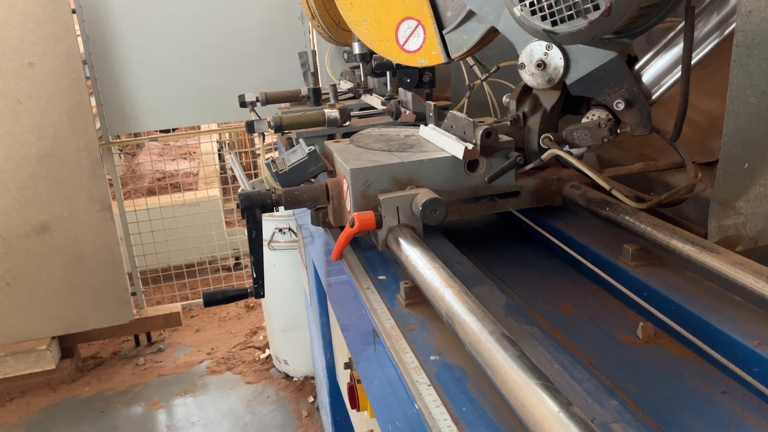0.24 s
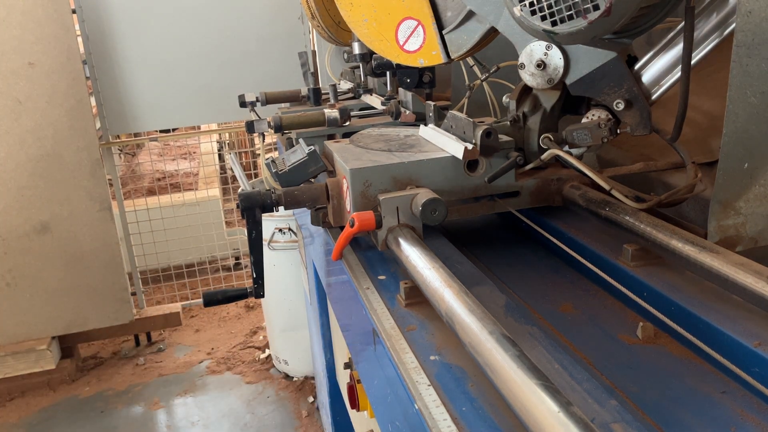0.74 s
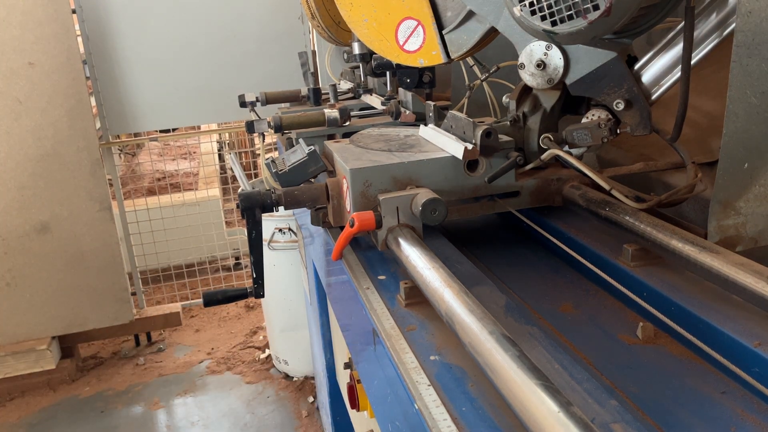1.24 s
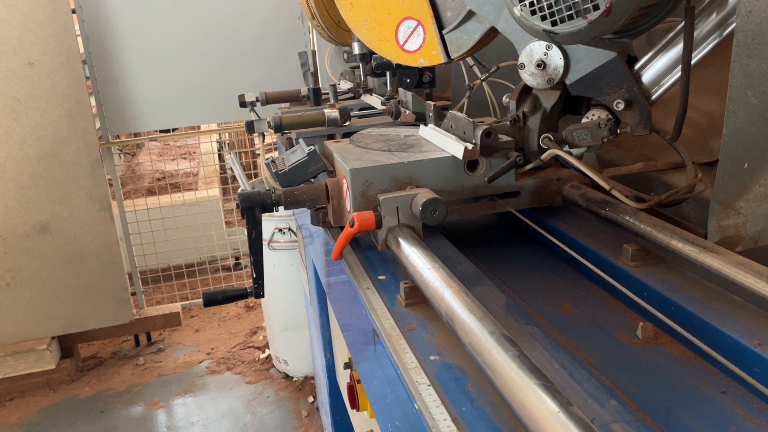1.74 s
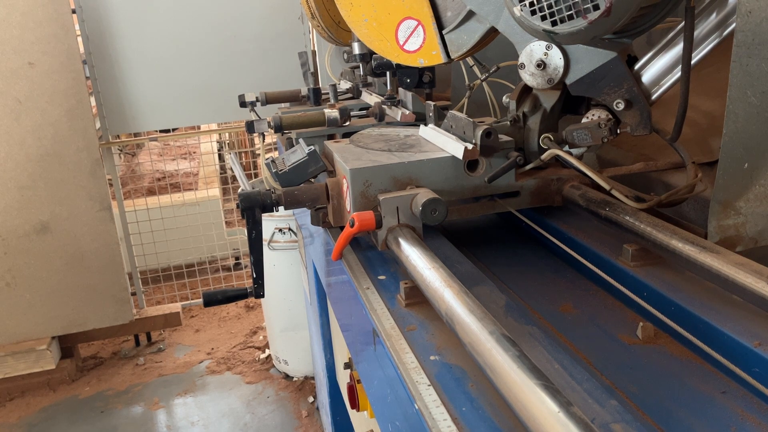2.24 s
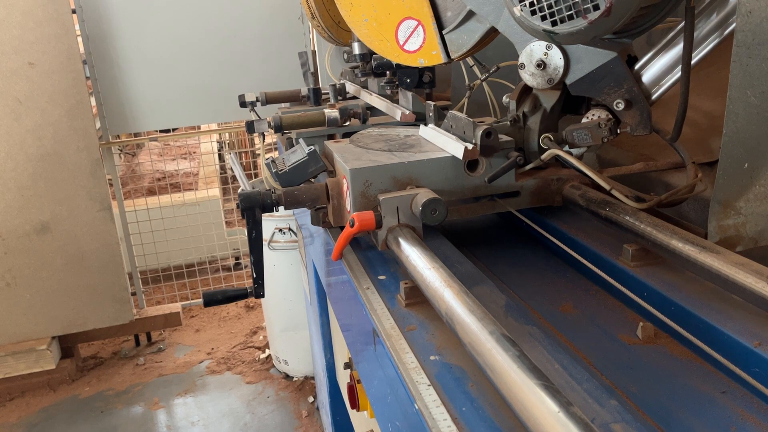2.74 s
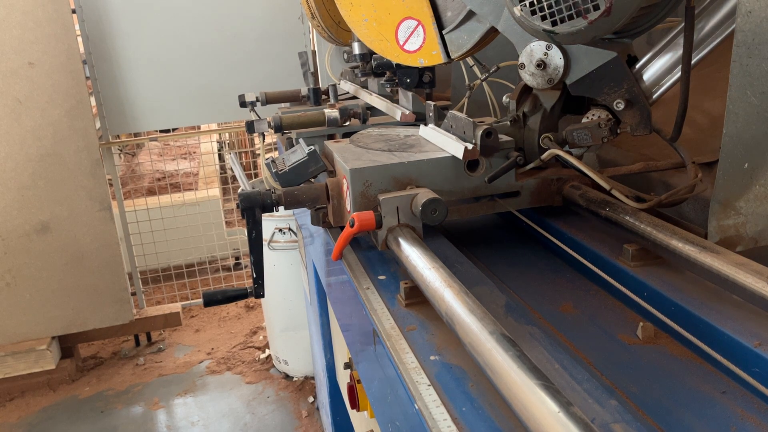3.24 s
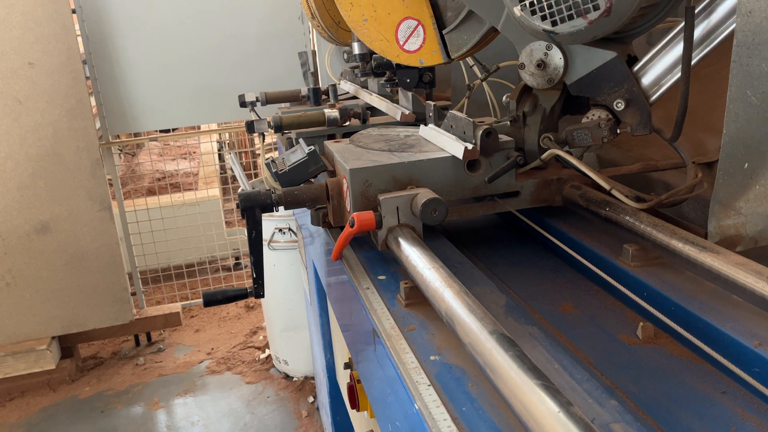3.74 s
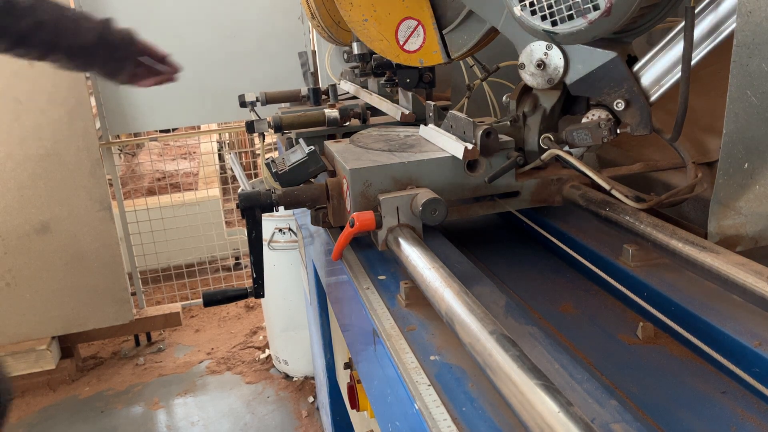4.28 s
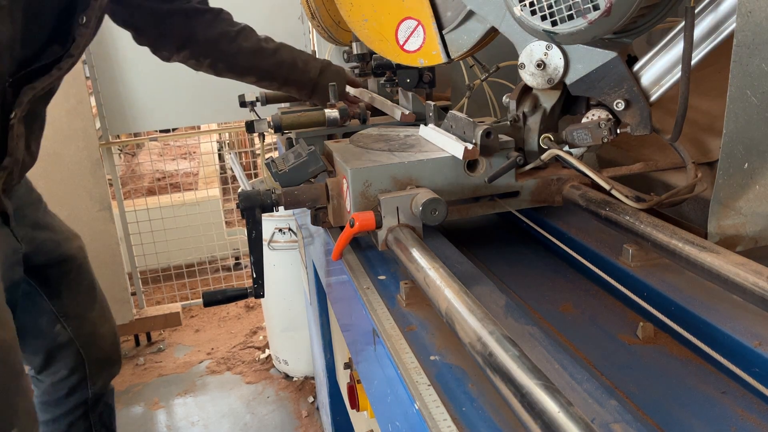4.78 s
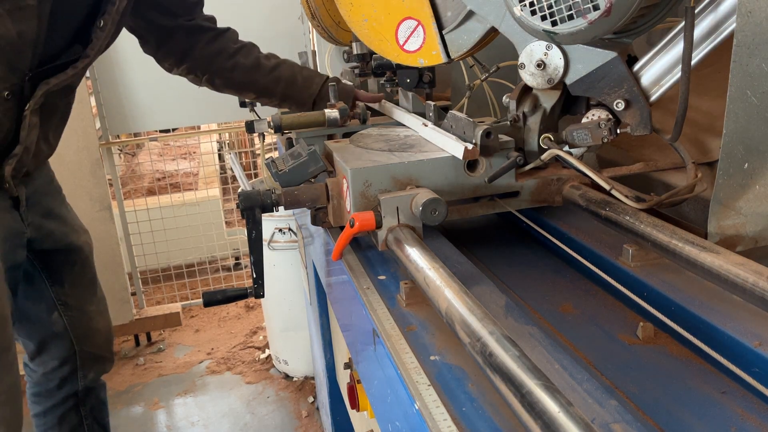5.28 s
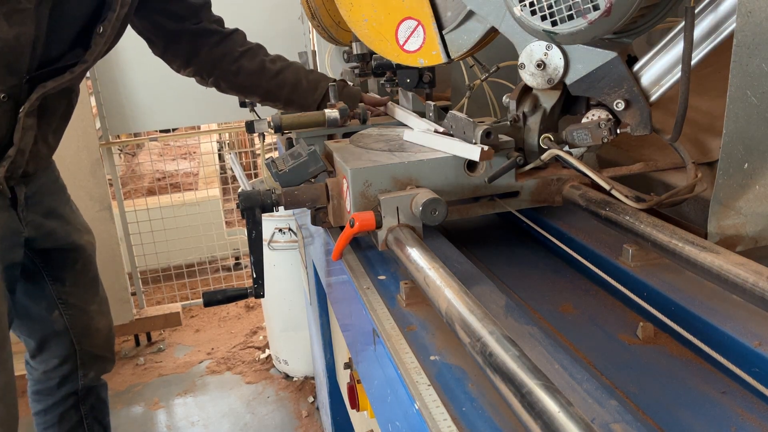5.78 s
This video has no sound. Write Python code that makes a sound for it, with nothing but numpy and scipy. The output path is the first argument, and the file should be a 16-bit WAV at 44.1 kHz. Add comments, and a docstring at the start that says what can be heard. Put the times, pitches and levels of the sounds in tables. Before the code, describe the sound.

A big mitre saw coasts down, its airy whir and whine steadily sinking while a rumbling head slides to its stop. A heavy clunk comes with a sharp burst of compressed air and a sputtering hiss. Small metallic knocks and clicks follow as the hum fades. Near the end a sleeve rustles and an aluminium bar is scraped, tapped and left ringing. Close stereo pickup in a dull, short-echo workshop.

```python
"""A mitre saw coasts down: blade wind and whine follow the falling shaft rate through fixed guard resonances.
Frame hum and guard drone swell at their critical speeds; the sliding head adds rumble until it eases off.
A valve spits and hisses (shaped noise), the head clunks on its stop (short low swings), fittings knock (modes).
Later a sleeve rustles and an aluminium profile is dragged, tapped and left ringing on the table.
A workshop murmur lies underneath; two microphones differ in phase and level over frequency."""
import sys
import numpy as np
from scipy import signal
from scipy.fft import rfft, irfft, next_fast_len
from scipy.io import wavfile
from scipy.ndimage import uniform_filter1d

SR = 44100
rng = np.random.default_rng(int(sys.argv[2]) if len(sys.argv) > 2 else 0)


def inscribe(sig):
    """Save sig as 16-bit PCM at rate SR to the path in sys.argv[1].

    A 1-D sig is mono; a 2-D sig holds one channel per row.
    Samples are clipped to [-1, 1] before scaling.
    """
    pcm = np.round(np.clip(np.atleast_2d(sig).T, -1, 1) * 32767)
    wavfile.write(sys.argv[1], SR, pcm.astype(np.int16))


N = 265393
T = np.arange(N) / SR

START_TURNS_PER_S, BRAKING_TURNS_PER_S2 = 42.75, 5.95


def shaft_rate():
    """Blade turns/s: bearing friction takes away the same speed every second."""
    return np.maximum(START_TURNS_PER_S - BRAKING_TURNS_PER_S2 * T, 1)


# blade guard resonances: f/Hz, width/Hz, level/dB re direct sound
GUARD = [(362, 44, 16), (418, 56, 15.5), (505, 56, 13), (600, 37, 6.5), (703, 65, 10.5), (867.6, 12, 11),
         (1010, 66, 7), (1243, 77, 2.5), (1659, 19, 10.5), (1970, 47, 3.5), (2540, 1100, 0),
         (10600, 4200, 6)]
HOLLOW_HZ, HOLLOW_WIDTH_HZ, HOLLOW_DB = 1375, 190, -5.5


def guard(hz):
    """Gain of the guard: resonances added in power to the direct sound, with one hollow between them."""
    power = 1
    for f, width, db in GUARD:
        power = power + undb(db) ** 2 / (1 + (2 * (hz - f) / width) ** 2) ** 2
    hollow = undb(HOLLOW_DB * np.exp(-(2 * (hz - HOLLOW_HZ) / HOLLOW_WIDTH_HZ) ** 2))
    return np.sqrt(power) * hollow


# wind round the blade: f/shaft rate, relative density/dB
WIND = [(3.4, -97), (8, -100.5), (14.5, -86), (22.5, -78), (34, -79.5), (52, -81.5), (73, -87), (112, -93),
        (190, -102), (335, -109), (780, -122)]
# blade whine: f/shaft rate, relative level/dB
WHINE = [(10.3, -66), (12, -66), (14, -65), (16, -62), (16.7, -62), (18, -54.5), (19.8, -62), (21.8, -62),
         (26, -66), (30.5, -64), (33, -66), (35.8, -66), (39.5, -66), (48, -66), (56, -69)]
# gain at the start speed, loss per halving of speed
WIND_DB, WIND_DB_PER_HALVING = 1.5, 6.5
WHINE_DB, WHINE_DB_PER_HALVING = -4.5, 7.5


def blade(flutter_db=1, waver_db=3.0, phase_waver_rad=0.59, side_spread_rad=0.26):
    """Wind and whine scale with shaft rate, so both sink through the fixed guard resonances."""
    shaft = shaft_rate()
    halvings = np.log2(START_TURNS_PER_S / shaft)
    hz, times, bins = signal.stft(field(), SR, nperseg=1024)
    bins = bins * undb(spectrum(WIND, hz[:, None] / np.interp(times, T, shaft)))
    wind = signal.istft(bins, SR)[1][:, :N]
    wind = wind * undb(WIND_DB - WIND_DB_PER_HALVING * halvings + flutter_db * walk(18))
    turn_rad = 2 * np.pi * np.cumsum(shaft) / SR
    whine = 0
    for multiple, db in WHINE:
        # a gliding tone crosses the room's standing waves: level and phase waver
        side_phase = side_spread_rad * np.array([walk(4.94), walk(4.64)])
        phase = multiple * turn_rad + phase_waver_rad * walk(19) + side_phase
        whine = whine + np.sqrt(2) * undb(db + waver_db * walk(9)) * np.sin(phase)
    whine = whine * undb(WHINE_DB - WHINE_DB_PER_HALVING * halvings)
    return colour(wind + whine, guard)


def critical(turns_per_s, half_width, db):
    """Gain of a part that shakes most at one shaft speed."""
    return undb(db) / (1 + ((shaft_rate() - turns_per_s) / half_width) ** 2)


# frame hum, guard drone, slide rumble: f/Hz, relative density/dB
HUM = [(25, -107), (45, -74), (66, -56), (88, -66), (122, -54.5), (150, -60), (175, -71), (205, -64),
       (270, -73.5), (600, -110)]
DRONE = [(250, -100), (320, -64.5), (360, -69), (425, -54), (470, -69), (515, -63), (570, -101),
         (800, -105)]
SLIDE = [(25, -89), (62, -65), (95, -61), (200, -66.5), (275, -81), (370, -71), (550, -79), (1050, -77),
         (1500, -83.5), (2500, -109), (6000, -105)]
SLIDE_END_S, SLIDE_RELEASE_T60_S, SLIDE_LEVEL_DB = 0.498, 0.085, 1


def frame(throb_db=1.5):
    """Frame and guard shake most at their critical speeds; the head's slide adds a rumble that then dies."""
    hum = noise(HUM) * critical(turns_per_s=28.4, half_width=6.4, db=-5) * undb(throb_db * walk(15))
    drone = noise(DRONE) * critical(turns_per_s=23.2, half_width=10.8, db=-13.5) * undb(2.6 * walk(12))
    sliding = fade(np.maximum(T - SLIDE_END_S, 0), SLIDE_RELEASE_T60_S)
    return hum + drone + noise(SLIDE) * sliding * undb(SLIDE_LEVEL_DB + 3.0 * walk(40.1))


def swing(db, hz, swell_s):
    """A heavy blow that swells and dies within a few swings."""
    t = T[:SR // 2]
    return -undb(db) * t / swell_s * np.exp(1 - t / swell_s) * np.sin(2 * np.pi * hz * t)


# head strikes its stop: t/s, level/dB
STOPS = [(0.836, -19), (0.89, -11.5)]
STOP_HZ, STOP_SWELL_S = 87, 0.0065
ROCK_S, ROCK_GAP_S, ROCK_HZ, ROCK_SWELL_S = .924, .072, 96, 0.017
ROCK_DB, ROCK_LOSS_DB = -24.5, 7


def clunk(count=3):
    """The head strikes its stop, then rocks on it evenly and ever more weakly."""
    out = np.zeros(N)
    for start, db in STOPS:
        add(out, start, swing(db, STOP_HZ, STOP_SWELL_S))
    for k in range(count):
        rock = swing(ROCK_DB - k * ROCK_LOSS_DB, ROCK_HZ, ROCK_SWELL_S)
        add(out, ROCK_S + k * ROCK_GAP_S, rock)
    return out


# steel blade modes: f/Hz, level/dB, t60/s
BLADE_RING = [(1710, -50, 0.77), (2230, -49, 0.38), (3160, -54, 0.48), (3300, -37, 0.47), (3640, -57, 0.44),
              (4260, -45, 1), (4150, -50, 0.8), (5270, -46.5, 0.53), (5300, -61, 0.72), (9883, -56, 0.79)]
CLUNK_S = .885


def blade_ring():
    """The jolt of the stop sets the blade's modes ringing."""
    out, t = np.zeros(N), T[:2 * SR]
    ring = sum(undb(db) * fade(t, t60) * np.sin(2 * np.pi * hz * t) for hz, db, t60 in BLADE_RING)
    add(out, CLUNK_S, ring * (1 - np.exp(-t / 0.0024)))
    return out


# light frame thumps: t/s, level/dB
THUMPS = [(.125, -35), (0.376, -27), (0.484, -41), (1.094, -33.5), (2.681, -31), (2.719, -30.5),
          (2.737, -34), (2.937, -35), (3.13, -31.5), (5.094, -34.5)]
# frame modes: f/Hz, relative level/dB, swell/s
FRAME_MODES = [(114.7, -2.5, 0.0085), (202.7, -5, 0.0062), (340, -5, 0.0037)]


def thumps():
    """Light blows swing the frame in its low modes."""
    out = np.zeros(N)
    for start, db in THUMPS:
        add(out, start, sum(swing(db + mode_db, hz, swell_s) for hz, mode_db, swell_s in FRAME_MODES))
    return out


def burst(start, db, rise_s, t60):
    """An envelope that opens quickly and dies away."""
    t = np.maximum(T - start, 0)
    return undb(db) * (1 - np.exp(-t / rise_s)) * fade(t, t60)


# spitting and exhausting air: f/Hz, relative density/dB
SPIT = [(300, -99), (1500, -81), (3000, -68.5), (5000, -73), (7500, -71), (10500, -71.5), (14500, -81)]
EXHAUST = [(100, -62), (400, -84), (900, -83), (2200, -78), (3300, -74.5), (4500, -79.5), (5600, -81.5),
           (7500, -85), (10500, -86), (14500, -102)]
# spits: t/s, level/dB, t60/s, gain below the treble/dB
SPITS = [(0.828, 7, 0.085, 1), (0.884, 8, 0.06, 2), (.938, -5, .04, 0), (1.021, 2, 0.055, -1),
         (1.076, 1, 0.09, -1), (2.105, -22, 0.3, -1), (3.834, -12, 0.38, 0), (4.382, -14.5, 0.25, -8),
         (4.418, -12.5, 0.36, -5)]
SPIT_RISE_PER_T60, SPIT_TREBLE_HZ = 0.029, 9300
EXHAUST_S, EXHAUST_RISE_S = .873, 0.0056


def air(flutter_db=0.2, sputter_db=1.5):
    """The valve spits noise and the cylinder empties: a first burst, then a long sputtering hiss."""
    jet = noise(SPIT)
    body = colour(jet, lambda hz: 1 / (1 + (hz / SPIT_TREBLE_HZ) ** 10))
    spits = 0
    for start, db, t60, body_db in SPITS:
        tinted = jet + (undb(body_db) - 1) * body
        spits = spits + tinted * burst(start, db, SPIT_RISE_PER_T60 * t60, t60)
    pressure = burst(EXHAUST_S, db=13, rise_s=EXHAUST_RISE_S, t60=0.083)
    pressure = pressure + burst(EXHAUST_S, db=5.3, rise_s=EXHAUST_RISE_S, t60=1.62)
    return spits + noise(EXHAUST) * pressure * undb(flutter_db * walk(69.7) + sputter_db * walk(500))


CONTACT_S = 0.0013
EDGE_T60_S, EDGE_CORNER_HZ = .06, 5000  # tick gain is proportional to corner / EDGE_CORNER_HZ


def strike(modes, db, corner_hz, favoured_hz, other_favoured_hz, held_t60, free_db, crack_db, tick_db,
           scatter_db=2.0, favour_db=9, favour_width=0.057, favour_sustain=0.41, split=0.0038,
           crack_t60=0.14, beat_hz=4, rebound_db=-7):
    """Metal rings briefly in contact, then faintly on; the struck spot favours modes near two pitches."""
    t = T[:int(.7 * SR)]
    attack = slice(0, int(.03 * SR))
    hz, held_db, ring_db, free_t60 = np.transpose(modes)[:, :, None]
    size, detune, beat, phase = rng.standard_normal((4, len(hz), 1))
    near = [np.exp(-(np.log(hz / f) / favour_width) ** 2) for f in (favoured_hz, other_favoured_hz)]
    favour = np.maximum(*near)
    # contact pressure pulls each mode slightly off its free pitch
    held = np.sin(2 * np.pi * (hz * (1 + split * detune) * t + phase))
    held = held * fade(t, held_t60 * (1 + favour_sustain * favour))
    held = held * undb(held_db + scatter_db * size + favour_db * favour)
    # each free mode is a close pair that beats slowly
    pair = np.sin(2 * np.pi * (hz * t + phase))
    pair = pair + np.sin(2 * np.pi * ((hz + beat_hz * beat) * t + size)) / 2
    free = undb(ring_db + free_db) * fade(t, free_t60) * pair
    ring = np.sum(held + free, axis=0)
    crack = lowpass(rng.standard_normal(len(t)), 2000, order=1) * fade(t, crack_t60)
    hit = ring / ring[attack].std() + undb(crack_db) * crack / crack[attack].std()
    hit = lowpass(hit * (1 - np.exp(-t / CONTACT_S)), corner_hz, order=3)
    # the part chatters once more within milliseconds
    add(hit, rng.uniform(.003, .007), undb(rebound_db) * hit[:len(t) // 2])
    # hard edges touch: faint bright tick
    tick = rng.standard_normal(len(t)) * fade(t, EDGE_T60_S)
    tick = undb(tick_db) * corner_hz / EDGE_CORNER_HZ * tick
    return undb(db) * (hit / hit[attack].std() + tick)


# slide and clamp modes: f/Hz, held level/dB, free level/dB, free t60/s
FITTINGS = [(671, 7.5, -5, 0.22), (760, 9, -21, .1), (795, 8.5, -17, .1), (855, 11, -13, 0.12),
            (928, 10.5, -10, 0.12), (1042, 14.5, -6, 0.16), (1106, 9.5, -15, 0.074), (1258, 9, -9, .1),
            (1518, 5, -23, .1), (1700, 5, -22, 0.14), (1807, 1, -16, 0.13), (1924, 1, -20, .08),
            (2310, -1, -28, 0.071), (2410, -6.5, -27, 0.063), (2635, -3, -26, .06), (2780, -0.5, -30, .07),
            (3116, 1.5, -24, .07), (3280, 5.5, -26, .06), (3440, -8, -27, .14), (3670, 2.5, -20, .07),
            (3780, 1, -24, .08), (4140, 5.5, -18, .06), (4930, 5, -23, 0.066), (5540, 0, -20, .1),
            (6880, 17.5, -6, 0.067)]
# knocks: t/s, level/dB, contact corner/Hz, two favoured f/Hz, base held t60/s
KNOCKS = [(0.363, -28.5, 1920, 1040, 1740, 0.072), (.875, -31.5, 4570, 3290, 3440, 0.097),
          (.94, -41, 4500, 3120, 3290, 0.032), (1.029, -37, 4230, 3290, 3450, 0.021),
          (1.052, -32, 3230, 1160, 2830, 0.02), (1.057, -29.5, 1630, 1060, 1090, 0.049),
          (2.662, -31, 3120, 772, 2370, 0.032), (2.712, -36, 4000, 2830, 3400, 0.015),
          (2.721, -47, 3470, 1260, 3300, 0.019), (2.911, -39.5, 3320, 2840, 3700, 0.022),
          (2.924, -46, 2980, 2340, 2970, 0.017), (3.094, -36, 2120, 870, 2080, 0.016),
          (3.104, -40.5, 2100, 840, 1850, 0.019), (3.121, -45, 1800, 1570, 1900, 0.019),
          (3.138, -48, 1550, 1260, 1580, 0.025), (3.158, -46, 1400, 1260, 1520, 0.023)]


def knocks(free_db=-3.5, crack_db=-11, tick_db=-20):
    """The saw's slide and clamps knock as they move, exciting their modes."""
    out = np.zeros(N)
    for start, *blow in KNOCKS:
        add(out, start, strike(FITTINGS, *blow, free_db, crack_db, tick_db))
    return out


# small loose part modes: f/Hz, relative level/dB, t60/s
LOOSE_PART = [(3860, -4, .04), (4385, -1, 0.12), (4630, -1, 0.047), (5140, -12, .04), (6230, -11, 0.037)]
# pings and rattles: t/s, level/dB
PINGS = [(2.713, -43), (3.05, -65), (3.335, -62), (3.391, -59.5), (4.258, -62)]


def pings(scatter_db=2):
    """A small loose metal part rings when jolted and rattles faintly afterwards."""
    out, t = np.zeros(N), T[:SR // 3]
    hz, mode_db, t60 = np.transpose(LOOSE_PART)[:, :, None]
    for start, db in PINGS:
        size, phase = rng.standard_normal((2, len(hz), 1))
        gain = undb(db + mode_db + scatter_db * size)
        ring = np.sum(gain * fade(t, t60) * np.sin(2 * np.pi * (hz * t + phase)), axis=0)
        add(out, start, ring * (1 - np.exp(-t / CONTACT_S)))
    return out


# bright ticks: t/s, level/dB
TICKS = [(3.45, -38), (3.458, -25)]


def ticks(tick_hz=10300, tick_t60=0.00069):
    """Tiny hard contacts with almost no ring."""
    out, t = np.zeros(N), T[:SR // 20]
    for start, db in TICKS:
        add(out, start, undb(db) * fade(t, tick_t60) * np.sin(2 * np.pi * tick_hz * t))
    return out


# aluminium profile modes: f/Hz, held level/dB, free level/dB, free t60/s
PROFILE = [(633, 3, -24, .3), (727, 6, -10, 0.84), (807, 5, -5, 0.74), (850, 11.5, -14, 0.33),
           (953, 7, -18, .3), (1080, 9, -13, 1.2), (1333, 6.5, -7, 2.3), (1424, 1, -14, .3),
           (1550, -3, 1, .75), (1690, 1.5, -8, 1.4), (1784, -2.5, -14, .3), (2000, 0.5, -18, .8),
           (2163, -1.5, -17, 1.8), (2400, -0.5, -18, .6), (2554, -7, -4.5, 0.85), (2826, 1.5, -12, 0.55),
           (2875, -16, -13, 1.1), (3040, 3, -11, 1.5), (3290, 0, -19, .4), (3564, 0.5, -11, 1),
           (3790, 5.5, -5.5, 0.65), (4100, -2.5, -14, 1.2), (4154, 1.5, -9, 0.36), (4380, -4, -25, 0.43),
           (4680, 0, -23, 0.63), (4780, 1, -22, .4), (5160, -2, -26, .3), (5780, 3.5, -29, .2),
           (6410, 4, -28, .2), (7070, 6.5, -28, .2)]
# rub of the profile: f/Hz, relative density/dB
DRAG = [(50, -79.5), (110, -61), (220, -65.5), (420, -60), (560, -69), (740, -80), (1050, -73.5),
        (1700, -84), (2800, -84), (4200, -95), (6000, -104), (12000, -112)]
# shoves over the table: t/s, level/dB, t60/s
SHOVES = [(4.99, -8.5, 0.88), (5.081, 3.5, 0.48), (5.205, -4.5, 0.59), (5.625, -0.5, 0.27),
          (5.713, -8, 0.23)]
SHOVE_RISE_S = 0.0035


def drag(judder_db=2, grit_db=-14, grit_per_s=130, grit_scatter_db=5, grit_t60=0.016):
    """The profile sticks and slips over the table; sawdust grains under it flick its modes."""
    t = T[:SR // 8]
    hz, mode_db, _, _ = np.transpose(PROFILE)[:, :, None]
    modes = undb(mode_db) * np.sin(2 * np.pi * (hz * t + rng.random(hz.shape)))
    ring = np.sum(modes, axis=0) * fade(t, grit_t60)
    grains = (rng.random(N) < grit_per_s / SR) * undb(grit_scatter_db * rng.standard_normal(N))
    grit = lowpass(signal.fftconvolve(grains, ring)[:N], 1500)
    rub = noise(DRAG)
    grit = undb(grit_db) * grit * rub.std() / grit.std()
    effort = sum(burst(start, db, SHOVE_RISE_S, t60) for start, db, t60 in SHOVES)
    return (rub * undb(judder_db * walk(110)) + grit) * effort


# taps on the table: t/s, level/dB, contact corner/Hz, two favoured f/Hz, base held t60/s
TAPS = [(4.9495, -33.5, 6560, 2750, 3410, 0.028), (5.029, -44.5, 4540, 3050, 3990, 0.06),
        (5.061, -40, 3600, 865, 3670, 0.066), (5.088, -34, 1450, 737, 925, 0.034),
        (5.2, -36.5, 3940, 2850, 3542, 0.038), (5.206, -42, 4150, 2830, 4600, 0.032),
        (5.217, -36, 3400, 1346, 3050, 0.03), (5.227, -37, 3400, 2900, 3052, 0.031),
        (5.229, -38.5, 1680, 738, 1346, .06), (5.238, -44, 2760, 2150, 2557, 0.031),
        (5.248, -42, 3200, 1346, 2580, 0.024), (5.289, -59, 3430, 1523, 2800, .04),
        (5.481, -50, 3500, 2880, 3900, 0.023), (5.5245, -36.5, 2780, 2050, 2003, 0.065),
        (5.527, -45.5, 4400, 2400, 3750, 0.024), (5.638, -47, 2600, 1750, 2520, 0.048),
        (5.698, -37.5, 4780, 2250, 3542, 0.023), (5.705, -45.5, 3800, 1750, 4330, 0.028)]


def taps(free_db=-30, crack_db=-13, tick_db=-21):
    """The profile taps and clatters on the table, which damps its ring."""
    out = np.zeros(N)
    for start, *blow in TAPS:
        add(out, start, strike(PROFILE, *blow, free_db, crack_db, tick_db))
    return out


LIFT_S, LIFTED_RING_DB = 5.225, -49.5
SET_DOWN_S, SET_DOWN_T60_S = 5.526, 0.7


def singing(waver_db=3.0, waver_rate_hz=30):
    """Lifted, the profile rings freely, wavering as the hand turns it; set down, it fades faster."""
    t = np.maximum(T - LIFT_S, 0)
    ring = 0
    for hz, _, free_db, t60 in PROFILE:
        gain = undb(free_db + waver_db * walk(waver_rate_hz)) * fade(t, t60)
        ring = ring + gain * np.sin(2 * np.pi * hz * t + walk(waver_rate_hz) / 2)
    damping = fade(np.maximum(T - SET_DOWN_S, 0), SET_DOWN_T60_S)
    return undb(LIFTED_RING_DB) * ring * (1 - np.exp(-t / CONTACT_S)) * damping


# sleeve rustle: f/Hz, relative density/dB
SLEEVE = [(800, -115), (3000, -103), (4300, -103), (6500, -105), (10000, -114), (14500, -122)]
REACH_S, REACH_WIDTH_S = 4.94, 0.4  # middle; distance to 1/e


def sleeve(crinkle_db=6.0):
    """A jacket sleeve rustles softly as the arm reaches in: noise under a bell-shaped envelope."""
    reach = np.exp(-((T - REACH_S) / REACH_WIDTH_S) ** 2)
    return noise(SLEEVE) * reach * undb(crinkle_db * walk(38))


def nearby(x, echo_db=-15, count=10):
    """Nearby surfaces add early echoes, some skewed by one sample between the sides."""
    out = x.copy()
    lags_s = rng.uniform(.002, .022, count)
    skews = rng.integers(-1, 2, count) * (rng.random(count) < .5)
    signs = rng.choice([-1, 1], count)
    for lag, skew, sign in zip(lags_s, skews, signs):
        add(out[0], lag, sign * undb(echo_db) * x[0])
        add(out[1], lag + skew / SR, sign * undb(echo_db) * x[1])
    return out / np.sqrt(1 + count * undb(echo_db) ** 2)


ROOM_T60_S, ROOM_DB, ROOM_TOP_HZ = 0.75, -9, 4530


def room(x):
    """A short, dull workshop tail that builds up just behind the direct sound."""
    t = T[:SR]
    tail = lowpass(field()[:, :SR], ROOM_TOP_HZ, order=1)
    tail = tail * fade(t, ROOM_T60_S) * (1 - np.exp(-t / 0.0019))
    tail = tail / np.sqrt(np.sum(tail ** 2) / 2) / 2
    return undb(ROOM_DB) * signal.fftconvolve(x[None], tail, axes=1)[:, :N]


# workshop murmur: f/Hz, relative density/dB
WORKSHOP = [(20, -100), (32, -73.5), (62, -69), (95, -71), (170, -74), (280, -84.5), (400, -79),
            (560, -95.5), (720, -88.5), (1350, -94.5), (1650, -89.5), (2200, -98), (5500, -110),
            (11000, -108), (15000, -113)]


def murmur():
    """The workshop's machines murmur: shaped noise, nearly steady."""
    return noise(WORKSHOP) * undb(0.085 * walk(3.8))


# unrelated part at the two microphones: f/Hz, level/dB re shared part
DIFFUSE = [(60, -18), (180, -14), (350, -6), (550, 0), (900, -1), (1300, -4), (2000, -13), (14000, -16)]


def field():
    """White noise at 0 dB per Hz as two microphones get it: partly shared, partly unrelated."""
    shared, own = rng.standard_normal((2, N)) * np.sqrt(SR / 2)
    own = colour(own, lambda hz: undb(spectrum(DIFFUSE, hz)))
    pair = np.array([shared + own, shared - own])
    return colour(pair, lambda hz: 1 / np.hypot(1, undb(spectrum(DIFFUSE, hz))))


def noise(points):
    """Stereo noise with a given spectrum."""
    return colour(field(), lambda hz: undb(spectrum(points, hz)))


def undb(db):
    """Decibels to gain."""
    return 10 ** (np.asarray(db) / 20)


def spectrum(points, hz):
    """Interpolate (f, value) points on a log-frequency axis."""
    at, value = np.transpose(points)
    return np.interp(np.log(np.maximum(hz, 1e-3)), np.log(at), value)


def colour(x, response):
    """Filter by a gain that is a function of frequency."""
    size = next_fast_len(N + SR // 10)
    hz = np.arange(size // 2 + 1) * SR / size
    return irfft(rfft(x, size) * response(hz), size)[..., :N]


def lowpass(x, hz, order=2):
    """Causal low-pass."""
    return signal.sosfilt(signal.butter(order, min(hz, SR / 2 - 1), fs=SR, output="sos"), x)


def walk(rate_hz):
    """Slow random signal with a standard deviation of 1."""
    k = int(SR / rate_hz)
    steps = np.repeat(rng.standard_normal(N // k + 1), k)
    x = uniform_filter1d(steps, k)[:N]
    return x / x.std()


def fade(t, t60):
    """Exponential decay, 60 dB in t60 seconds."""
    return np.exp(-np.log(1000) * t / t60)


def add(out, start, x):
    """Mix a sound in at its time in seconds."""
    i = int(start * SR)
    out[..., i:i + x.shape[-1]] += x[..., :N - i]


def scene():
    """The saw, its blows and the handled profile with their echoes, over the murmur."""
    hits = knocks() + taps() + singing() + pings() + ticks() + blade_ring()
    saw = blade() + frame() + clunk() + thumps()
    return saw + nearby(air() + drag()) + sleeve() + hits + room(hits) + murmur()


# microphone pair: f/Hz, left lead/rad
PORT_PHASE = [(20, 0), (300, 0), (600, 1.2), (1210, 3.6), (1550, 4), (1810, 6.4), (2930, 7.2), (4910, 6.7),
              (5770, 5.5), (7320, 4.1), (8300, 3.14), (9500, 2.1), (11100, .4), (13000, -.3), (14800, -3.2)]
# microphone pair: f/Hz, left minus right/dB
PORT_BALANCE = [(250, 0.36), (700, 2.6), (1200, 3.5), (2300, 1.1), (4300, 4.6), (8000, 0.17)]
BOTTOM_HZ, TOP_HZ = 37, 14500


def record(dry):
    """The microphones differ in phase and level across the band; the deepest bass and the top are cut."""
    sides = np.array([[1], [-1]]) / 2

    def port(hz):
        """Gain and phase of each side."""
        return np.exp(1j * sides * spectrum(PORT_PHASE, hz)) * undb(sides * spectrum(PORT_BALANCE, hz))

    pair = colour(dry, port)
    pair = signal.sosfilt(signal.butter(6, BOTTOM_HZ, "high", fs=SR, output="sos"), pair)
    return signal.sosfilt(signal.ellip(8, .2, 70, TOP_HZ, fs=SR, output="sos"), pair)


dry = scene()
out = record(dry)
inscribe(out)
```